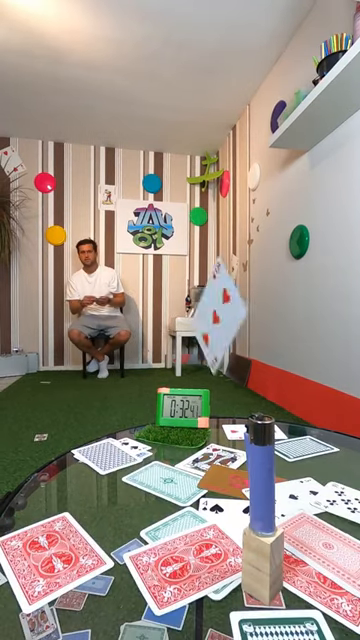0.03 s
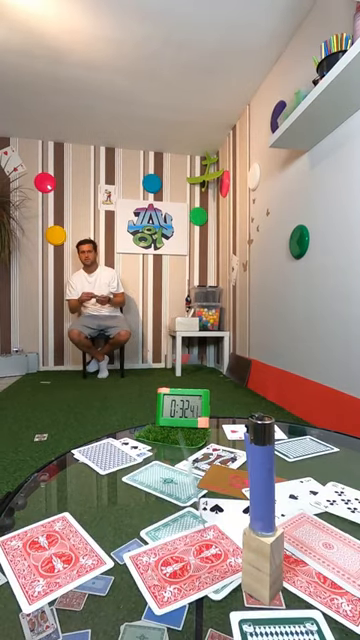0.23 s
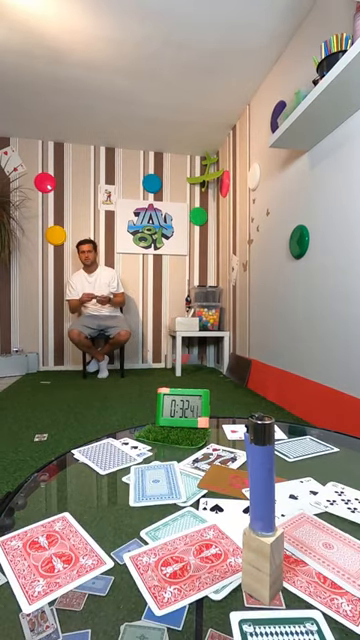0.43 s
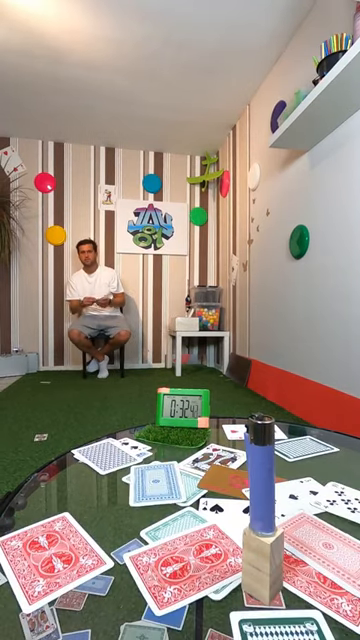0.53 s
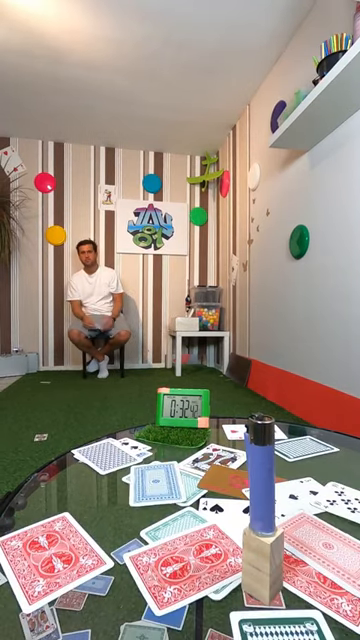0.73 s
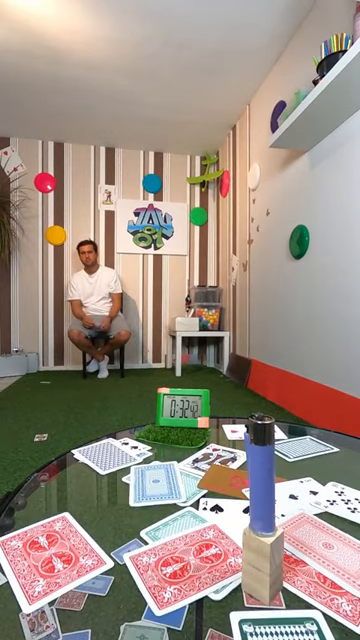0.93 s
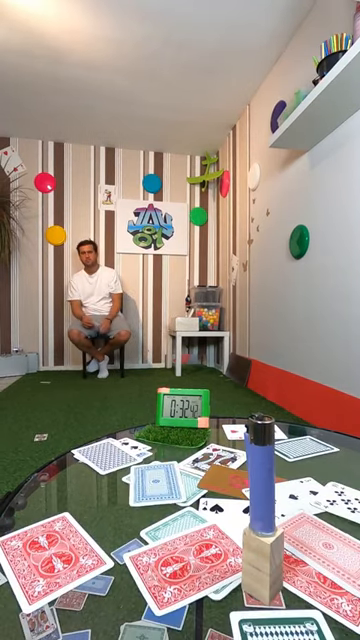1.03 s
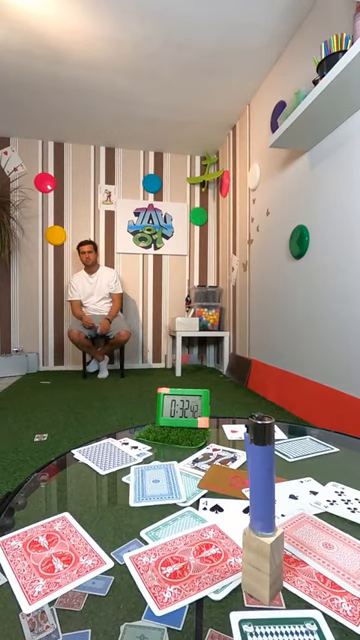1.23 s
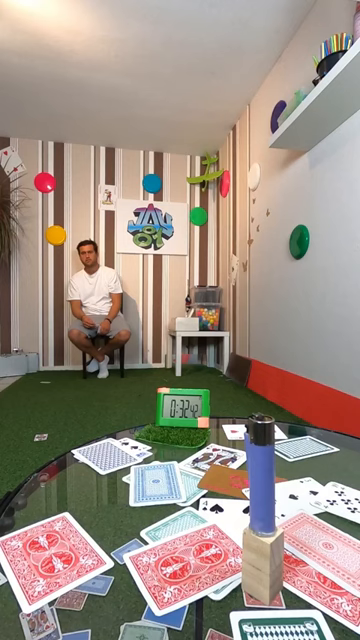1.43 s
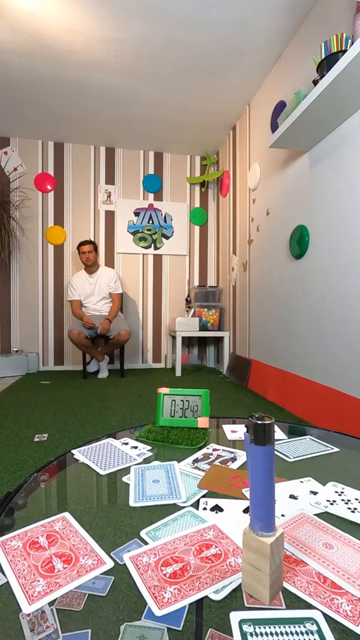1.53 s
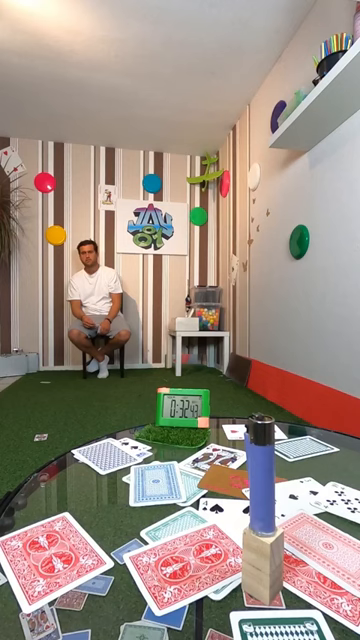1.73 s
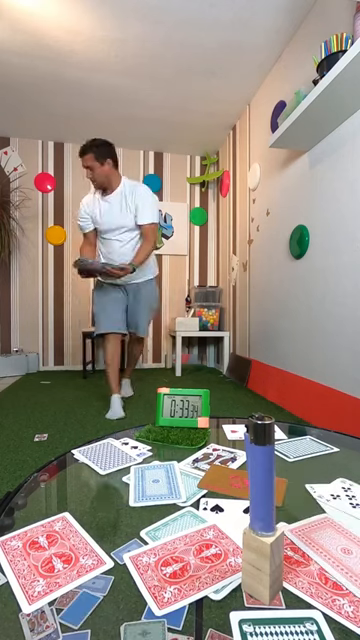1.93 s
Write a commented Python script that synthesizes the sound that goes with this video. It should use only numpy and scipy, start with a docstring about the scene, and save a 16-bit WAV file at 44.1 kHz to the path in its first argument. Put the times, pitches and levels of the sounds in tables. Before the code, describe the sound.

A playing card hits a glass tabletop sharply and lands again more softly in a small room.

```python
"""Over quiet room air and faint swishes, a low hum swells and a thrown playing card ticks on its edge,
then smacks onto a glass table close to the microphone (0.23 s). The card cracks, the glass top rings low
and a small live room answers. The card drops flat (0.52 s) and gives one last thin tick. Across the room
the thrower's hands come down with a soft slap (1 s); a deep rumble follows, and a low thump comes at
the very end."""
import sys
import numpy as np
from scipy import signal
from scipy.fft import rfft, irfft
from scipy.io import wavfile

SR = 44100
rng = np.random.default_rng(int(sys.argv[2]) if len(sys.argv) > 2 else 0)


def int16_out(signal):
    """Quantize to a 16-bit WAV file."""
    q = np.round(np.clip(np.atleast_2d(signal).T, -1, 1) * 32767)
    wavfile.write(sys.argv[1], SR, q.astype(np.int16))


N = 88200
T = np.arange(N) / SR
FREQS = np.maximum(np.arange(N + 1) * SR / (2 * N), 1)


def undb(db):
    """Decibels to gain."""
    return 10 ** (np.asarray(db) / 20)


def unit(x):
    """Scale to unit energy."""
    return x / np.sqrt(np.sum(x ** 2))


def curve(points, hz=FREQS):
    """Read breakpoints on a log-frequency axis."""
    freqs, values = np.array(points, float).T
    return np.interp(np.log(hz), np.log(freqs), values)


def equalise(x, db):
    """Minimum-phase EQ: nothing rings ahead of an attack."""
    cepstrum = irfft(db * np.log(10) / 20)
    cepstrum[1:N] *= 2
    cepstrum[N + 1:] = 0
    return irfft(rfft(x, 2 * N) * np.exp(rfft(cepstrum)))[:N]


def noise(eq):
    """Steady coloured noise, rms 1."""
    return unit(equalise(rng.standard_normal(N), curve(eq))) * np.sqrt(N)


def decay(t60):
    """Exponential decay, 60 dB in t60 seconds."""
    return np.exp(-np.log(1000) * T / t60)


def attack(rise_s):
    """Onset easing up to full level."""
    return 1 - np.exp(-T / rise_s)


def swell(centre, half):
    """Bell-shaped rise and fall."""
    return np.exp(-((T - centre) / half) ** 2)


def at(x, start):
    """Cue a sound at its start time."""
    return np.concatenate([np.zeros(int(start * SR)), x])[:N]


def burst(t60, rise_s):
    """A short spray of micro-contacts, unit energy."""
    return unit(rng.choice([-1, 1], N) * decay(t60) * attack(rise_s))


# room tone EQ: f/Hz, level/dB
AIR_EQ = [(25, -6), (45, -3), (80, -10.5), (108, -15), (150, -2), (215, -3), (320, -11), (450, -16),
          (800, -23), (1250, -21.5), (2500, -32.5), (6400, -43), (9500, -47.5), (11000, -43),
          (15500, -52.5)]

def room_air():
    """A quiet, bass-heavy noise bed."""
    return undb(-65.5) * noise(AIR_EQ)


# swish cues: t/s, half length/s, level/dB
SWISHES = [(0.039, 0.024, -78), (0.106, 0.23, -81), (1.405, 0.042, -82)]
# swish EQ: f/Hz, level/dB
SWISH_EQ = [(500, -13.5), (2000, -5.5), (5500, 0), (9000, -5.5), (14000, -16.5)]

def swishes():
    """Cloth and card rustle in faint swells of bright noise."""
    return noise(SWISH_EQ) * sum(undb(db) * swell(t, half) for t, half, db in SWISHES)


# sub-bass swells: t/s, half length/s, f/Hz, level/dB
RUMBLES = [(0.173, 0.05, 45.4, -57), (0.251, 0.012, 32.2, -41.5), (0.569, 0.024, 53.5, -57),
           (0.769, 0.065, 38.94, -54), (1.079, 0.07, 31.72, -41.5), (1.199, 0.021, 34.6, -41),
           (1.287, 0.044, 34, -50.5), (1.661, .15, 43.8, -63.5)]

def rumble():
    """Almost pure swells of deep bass, and a low hum just before the card lands."""
    hum = (.17, .045, 178, -53)  # same columns
    return sum(undb(db) * swell(t, half) * np.sin(2 * np.pi * hz * (T - t))
               for t, half, hz, db in RUMBLES + [hum])


# EQ of the thump's tick and hiss: f/Hz, level/dB
THUMP_EQ = [(240, -40.5), (400, -7.5), (625, -2), (1070, -2), (1940, -6), (2980, -3), (14000, -24)]

def thump(start_s=1.965, sub_hz=31.2):
    """A tick on top of a sub-bass wobble, with a little hiss."""
    tick = unit(equalise(decay(.0021), curve(THUMP_EQ)))
    wobble = -decay(.25) * np.sin(2 * np.pi * sub_hz * T)
    hiss = noise(THUMP_EQ)
    return at(undb(-32.5) * (tick + wobble) + undb(-62) * hiss, start_s)


# reverb time of the room: f/Hz, t60/s
ROOM_T60 = [(150, .6), (500, .48), (1500, 0.39), (4000, .46), (8000, .41), (14000, 0.2)]

def room_reverb(early_gain=.48, wall_lag_s=.027, rise_s=.001):
    """Diffuse impulse response: weak early reflections, then the walls; the treble dies first."""
    spectrum = rfft(rng.standard_normal(2 * N))
    octave = np.clip(np.log2(FREQS / 125), 0, 7)
    tail = 0
    for k in range(8):
        band = irfft(spectrum * np.maximum(1 - abs(octave - k), 0))[:N]
        tail += band * decay(curve(ROOM_T60, 125 * 2 ** k))
    walls = .5 + .5 * np.tanh((T - wall_lag_s) / rise_s)
    return unit(tail * (early_gain + (1 - early_gain) * walls) * attack(rise_s))


# hand slap cues: t/s, level/dB, t60/s
SLAPS = [(.9745, -26, 0.069), (.980, -26.5, 0.094), (1.004, -28, 0.064)]
# slap EQ: f/Hz, level/dB
SLAP_EQ = [(120, -6), (200, 3.5), (330, -4), (430, 4.5), (560, 0.5), (900, -11.5), (1120, -13), (1320, 1.5),
           (1600, -5), (1900, -4.5), (2700, -11.5), (3800, -19.5), (5500, -17.5), (8000, -22.5),
           (11000, -32), (14000, -41)]

def hands(send_db=1.5):
    """Dull, distant slaps, heard mostly through the room."""
    direct = 0
    for start, db, t60 in SLAPS:
        slap = unit(equalise(burst(t60, rise_s=.002), curve(SLAP_EQ)))
        direct += undb(db) * at(slap, start)
    return direct + undb(send_db) * signal.fftconvolve(direct, room_reverb())[:N]


# reverb EQ for an edge-on contact: f/Hz, level/dB
EDGE_ECHO_EQ = [(90, -35), (160, -3), (220, 2), (400, -6), (490, 0), (620, -4.5), (800, -6.5), (1300, -3),
                (2400, -2.5), (2900, -4.5), (3900, -1.5), (4700, -4.5), (6500, -10), (8500, -16.5),
                (9600, -29.5), (12000, -32.5), (15000, -43.5)]
# reverb EQ for a face-down contact: f/Hz, level/dB
FLAT_ECHO_EQ = [(100, -21.5), (160, 4), (300, 3.5), (500, 5.5), (700, -3.5), (1000, -1.5), (2000, -2.5),
                (3000, -2), (4200, -8.5), (5300, -0.5), (6500, -13), (8500, -20), (10000, -25),
                (13000, -31.5), (15000, -46.5)]
# the card's resonances in the room: f/Hz, width/Hz, level/dB
ECHO_PEAKS = [(1736, 110, 5), (2255, 57, 4), (2425, 50, 5), (3360, 100, 2.5), (3525, 90, 7), (3981, 110, 4),
              (5070, 100, 2.5), (5780, 300, -5), (6200, 150, 8)]

def card_echo(flat, tilt_db):
    """The room answers a contact; the card's resonances colour it most when it hits edge-on."""
    peaks_db = sum(db / (1 + (2 * (FREQS - hz) / width) ** 2) for hz, width, db in ECHO_PEAKS)
    eq_db = (1 - flat) * (curve(EDGE_ECHO_EQ) + peaks_db) + flat * curve(FLAT_ECHO_EQ)
    return unit(equalise(room_reverb(), eq_db + tilt_db))


def ring(modes):
    """Struck modes, each dying at its own rate."""
    return sum(undb(db) * decay(t60) * np.sin(2 * np.pi * hz * T) for hz, t60, db in modes)


# modes of the glass top: f/Hz, t60/s, level/dB
GLASS_MODES = [(150, .6, -44), (175, .5, -40), (196, .06, -21), (204, .42, -23.5), (205, .95, -37),
               (245, .1, -26), (304, .5, -42), (415, .35, -47), (484, .65, -42), (551, .45, -47),
               (592, .35, -48)]

def glass_ring():
    """Pushed by the card, the table top rings low and long."""
    return ring(GLASS_MODES) * attack(.002)


# modes of the card: f/Hz, t60/s, level/dB
CARD_MODES = [(1406, 0.035, -26.5), (1861.6, 0.033, -28.5), (2445, 0.063, -23.5), (3303, .03, -26.5),
              (3580, .04, -20.5), (4060, .022, -17.5), (5524, .025, -27.5), (6450, .02, -26.5)]

def card_ring(flat, rise_s=.0004, flat_mute_db=-12):
    """The card rings high and short, and hardly at all when lying flat."""
    onset = 1 - np.exp(-(T / rise_s) ** 2)
    return undb(flat * flat_mute_db) * ring(CARD_MODES) * onset


# crack EQ, edge-on: f/Hz, level/dB
EDGE_CRACK_EQ = [(60, -22.5), (120, -26.5), (200, -14.5), (300, -11.5), (800, -10), (1500, -2),
                 (2900, -11.5), (4000, 2), (5800, -11.5), (6500, -8), (8200, -7.5), (9100, -22),
                 (10000, -19.5), (12500, -35), (15500, -48.5)]
# crack EQ, face-down: f/Hz, level/dB
FLAT_CRACK_EQ = [(100, -20.5), (180, 5), (350, 2), (900, -4), (1300, -1), (1950, 2.5), (2500, -6),
                 (3300, 1), (4200, -13), (4800, -2.5), (6300, -10.5), (8000, -16), (9500, -26.5),
                 (12000, -32.5), (15500, -48.5)]

def card_crack(t60, flat, tilt_db, crossover_hz=2800, rise_s=.00077):
    """The transient of card on glass: two bands of micro-contacts, the treble dying before the body."""
    body = rfft(burst(1.15 * t60, rise_s), 2 * N)
    treble = rfft(burst(.65 * t60, rise_s), 2 * N)
    low_share = 1 / (1 + (FREQS / crossover_hz) ** 4)
    snap = irfft(body * np.sqrt(low_share) + treble * np.sqrt(1 - low_share))[:N]
    eq_db = (1 - flat) * curve(EDGE_CRACK_EQ) + flat * curve(FLAT_CRACK_EQ)
    return unit(equalise(snap, eq_db + tilt_db))


# card hits on the glass: t/s, level/dB, tilt/(dB per octave), base crack t60/s,
# push on the glass/dB, reverb send/dB, flatness (0 on its edge, 1 on its face)
CONTACTS = [(.2030, -44.5, -7, 0.012, -11, -1, 0), (0.2134, -36, -6, 0.028, -10, -28, 0),
            (.2245, -23, -2, .016, -7.5, -3, 0), (0.2344, 1.5, -1, 0.023, -2, 2.5, 0),
            (0.5105, -17.5, 0, 0.014, -13.5, -0.5, 0.59), (0.5168, -10, 1, 0.022, -11, -8, 0.87),
            (0.5267, -22.5, 1, 0.02, -9, -5, 1), (.6315, -45.5, 13, .022, -7.5, -14, 0.94)]

def card(crack_db=6, reverb_return_db=4, tilt_pivot_hz=3000):
    """Each contact cracks, rings the card and the glass, and sets off the room."""
    glass = glass_ring()
    hits = 0
    for start, db, slope, t60, push_db, send_db, flat in CONTACTS:
        tilt_db = slope * np.log2(np.maximum(FREQS, 500) / tilt_pivot_hz)
        crack = undb(crack_db) * card_crack(t60, flat, tilt_db)
        echo = undb(send_db + reverb_return_db) * card_echo(flat, tilt_db)
        rings = card_ring(flat) + undb(push_db) * glass
        hits += undb(db) * at(crack + echo + rings, start)
    return hits


def scene():
    """Every layer sits in the centre; only a faint, steady hiss is stereo."""
    centre = card() + hands() + swishes() + rumble() + thump() + room_air()
    faint_hiss = undb(-89.5) * rng.standard_normal((2, N))
    return centre + faint_hiss


# treble pan, left relative to right: f/Hz, level/dB
TREBLE_PAN = [(11500, 0), (13000, -3), (15000, -4)]
# treble width, a side signal 90 degrees out of phase: f/Hz, level/dB
TREBLE_WIDTH = [(3000, -70), (5000, -42), (8000, -32), (10500, -26), (12500, -10), (15000, -6)]

def record(dry, high_cut_hz=15800):
    """The highest treble leans right and spreads; a steep high cut follows."""
    sides = np.array([[1], [-1]])
    pan = undb(sides * curve(TREBLE_PAN) / 2)
    width = 1j * sides * undb(curve(TREBLE_WIDTH))
    stereo = irfft(rfft(dry, 2 * N) * (pan + width))[:, :N]
    high_cut = signal.ellip(8, .2, 70, high_cut_hz, fs=SR, output="sos")
    return signal.sosfilt(high_cut, stereo)


dry = scene()
out = record(dry)
int16_out(out)
```